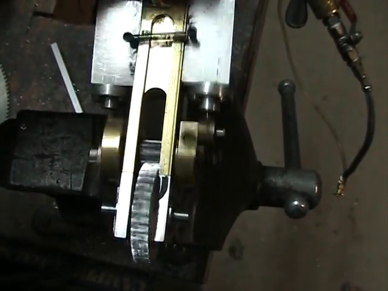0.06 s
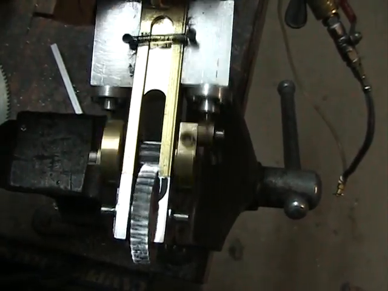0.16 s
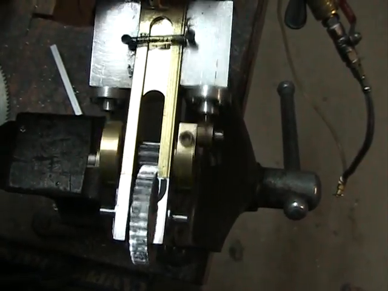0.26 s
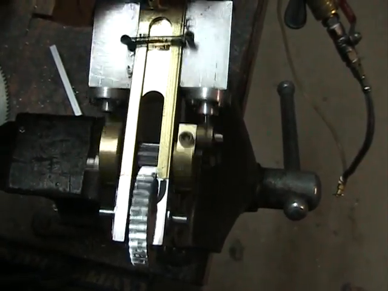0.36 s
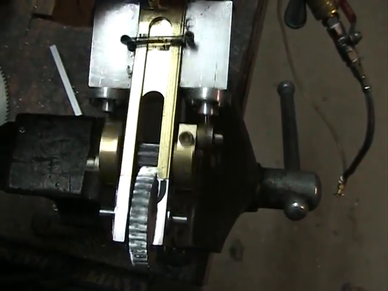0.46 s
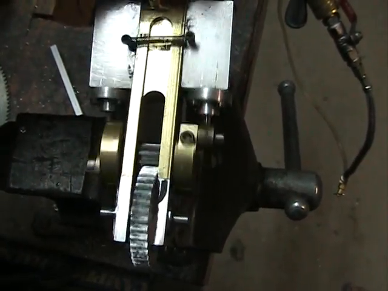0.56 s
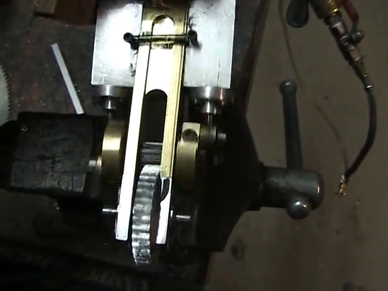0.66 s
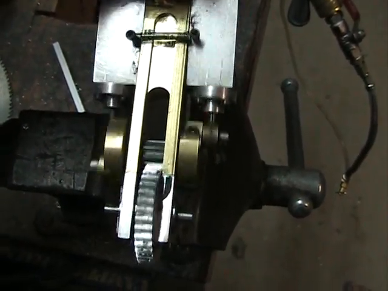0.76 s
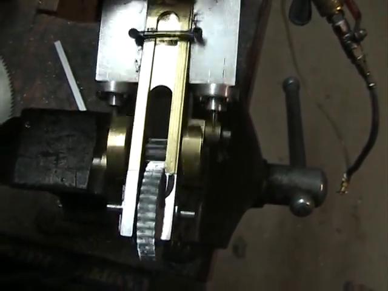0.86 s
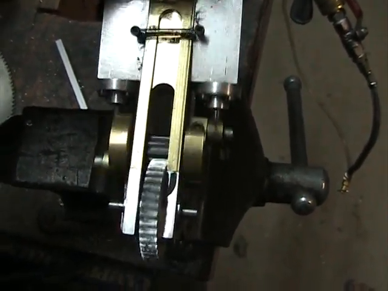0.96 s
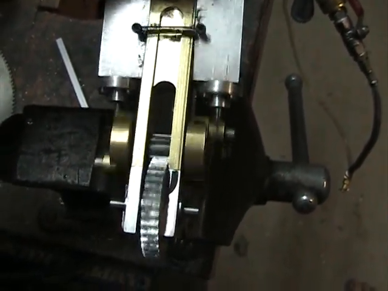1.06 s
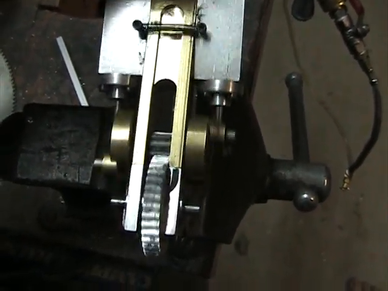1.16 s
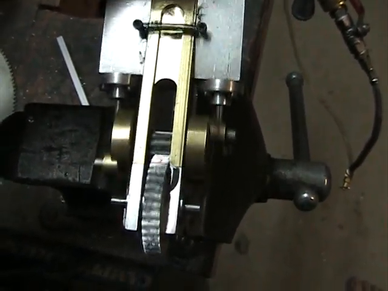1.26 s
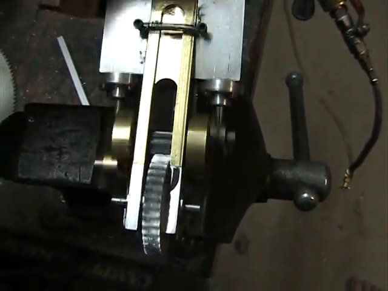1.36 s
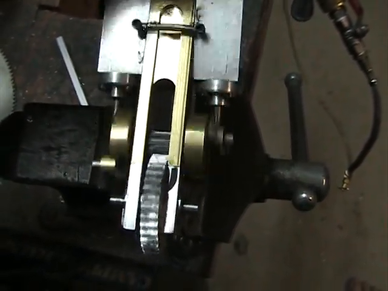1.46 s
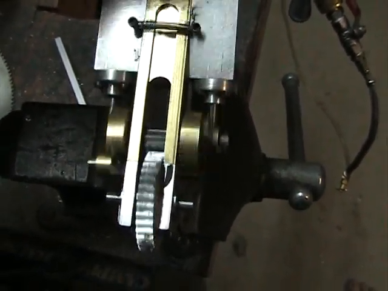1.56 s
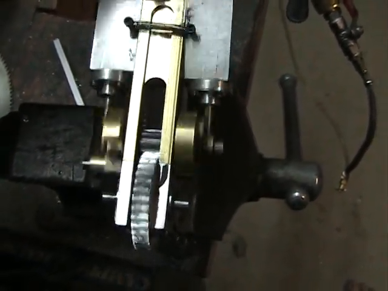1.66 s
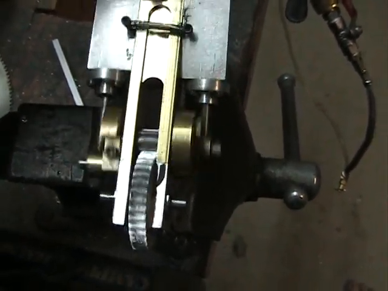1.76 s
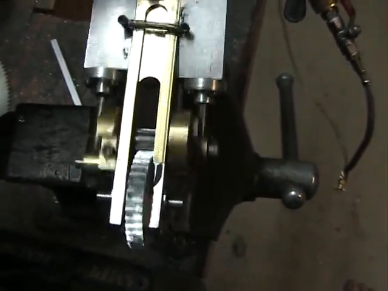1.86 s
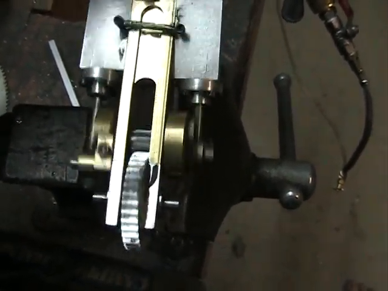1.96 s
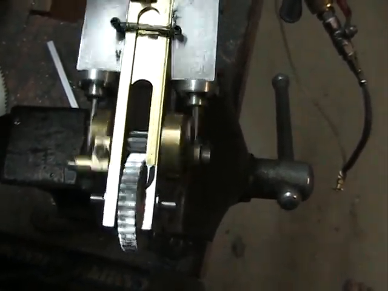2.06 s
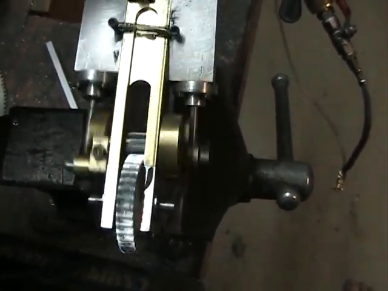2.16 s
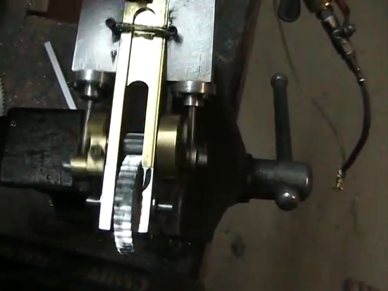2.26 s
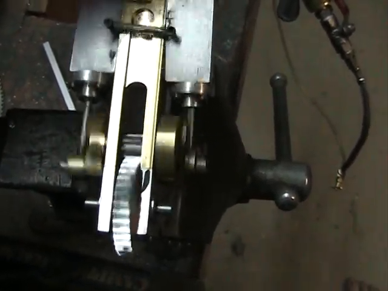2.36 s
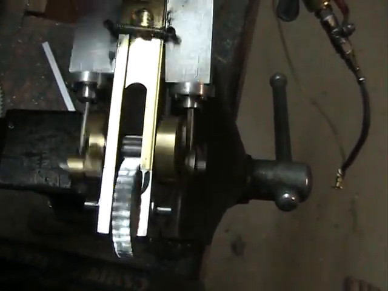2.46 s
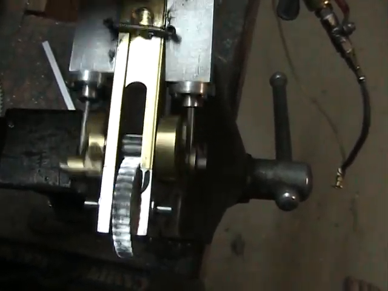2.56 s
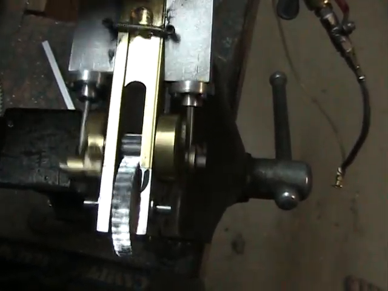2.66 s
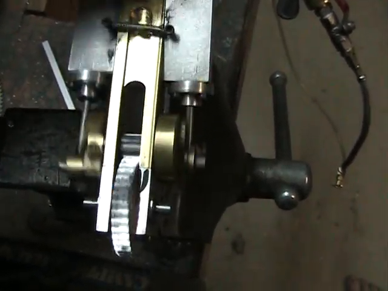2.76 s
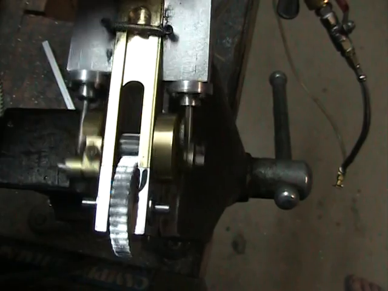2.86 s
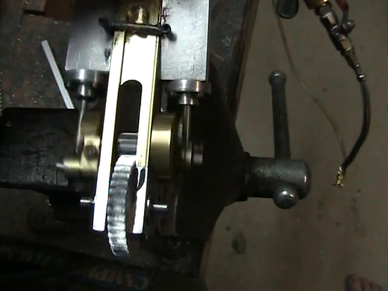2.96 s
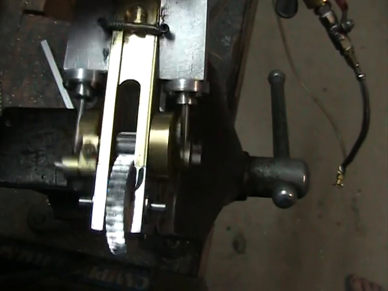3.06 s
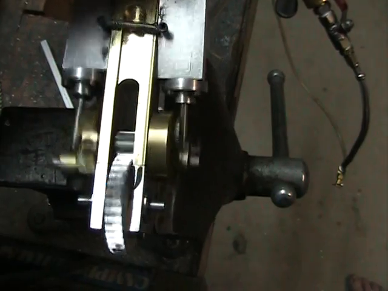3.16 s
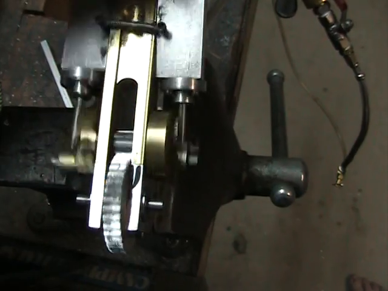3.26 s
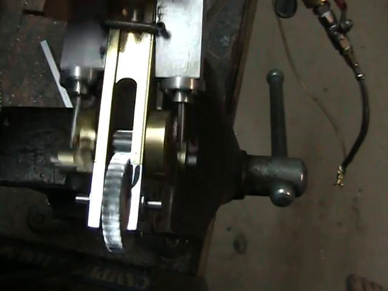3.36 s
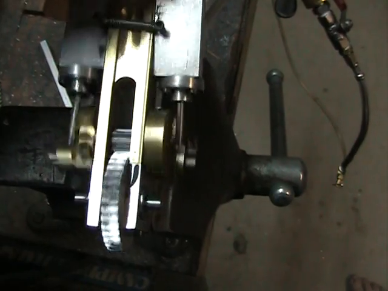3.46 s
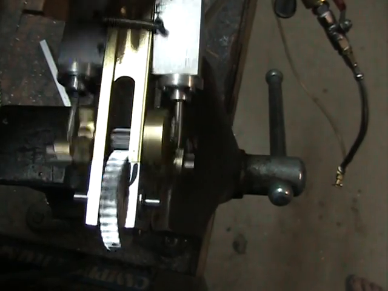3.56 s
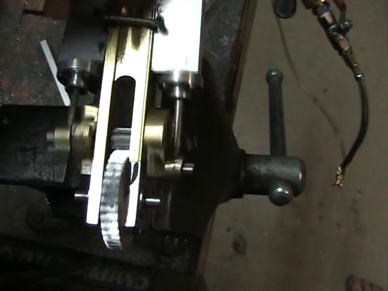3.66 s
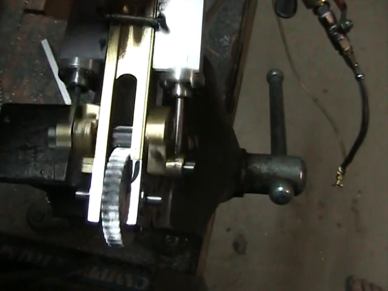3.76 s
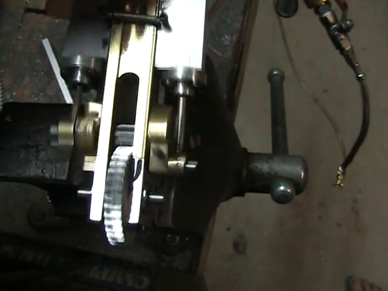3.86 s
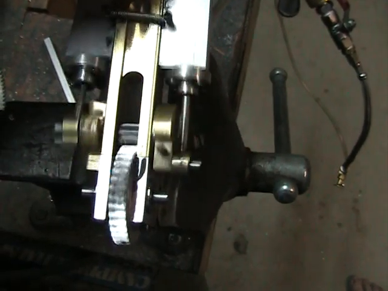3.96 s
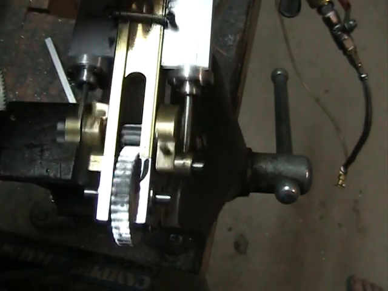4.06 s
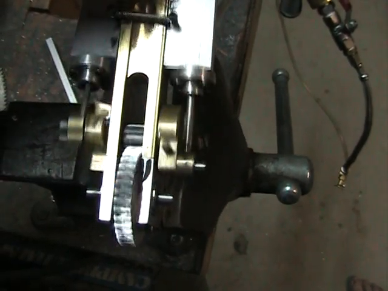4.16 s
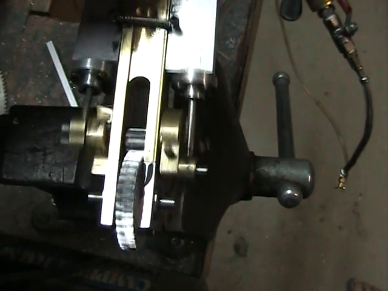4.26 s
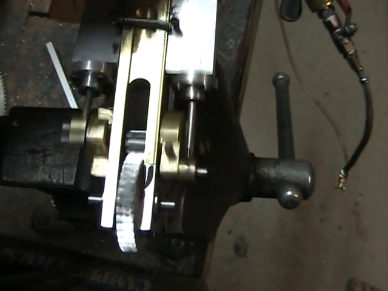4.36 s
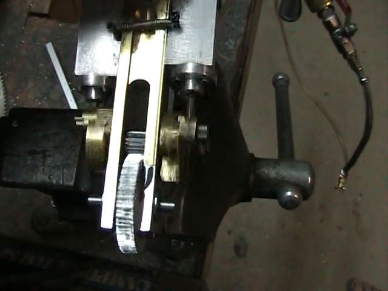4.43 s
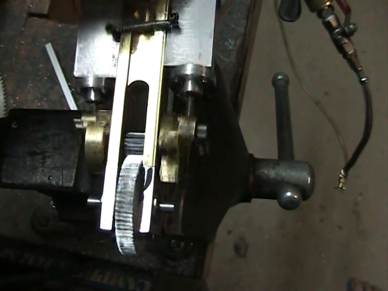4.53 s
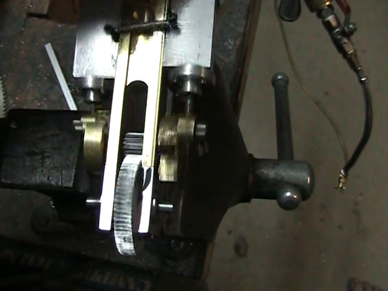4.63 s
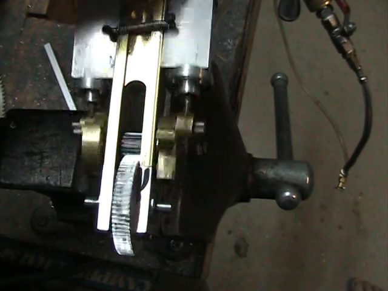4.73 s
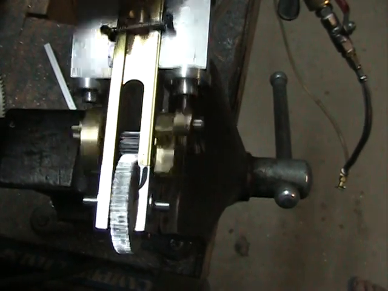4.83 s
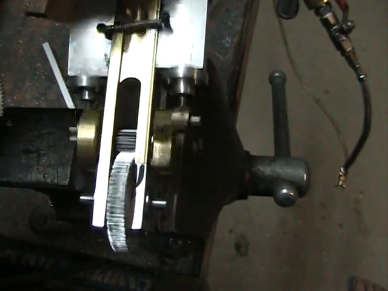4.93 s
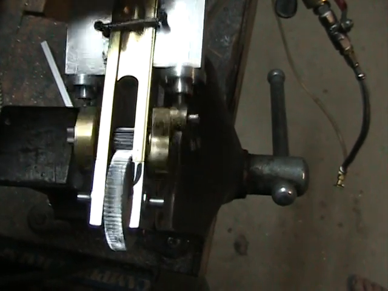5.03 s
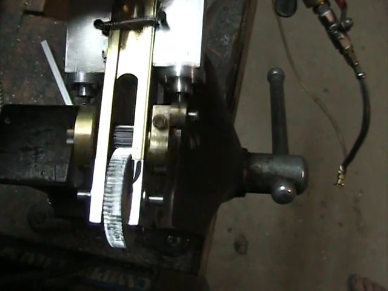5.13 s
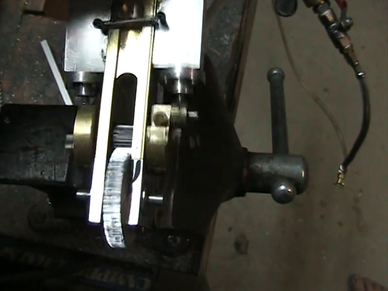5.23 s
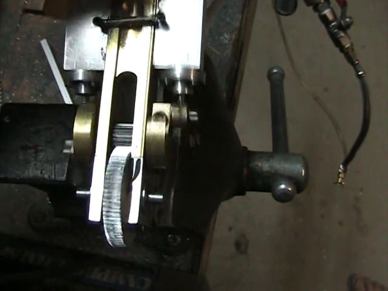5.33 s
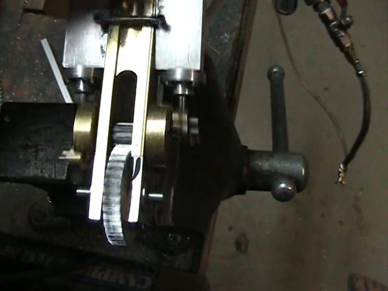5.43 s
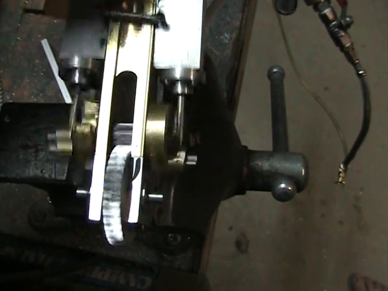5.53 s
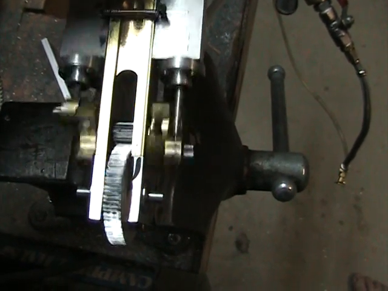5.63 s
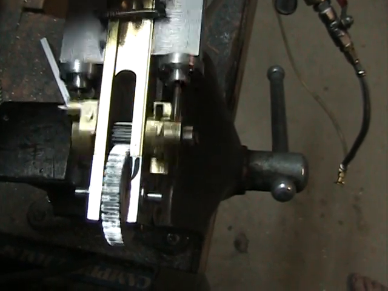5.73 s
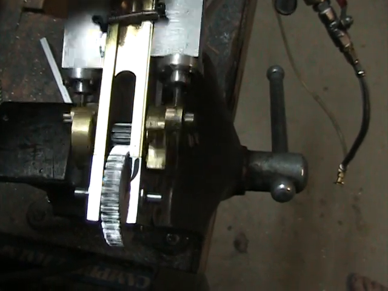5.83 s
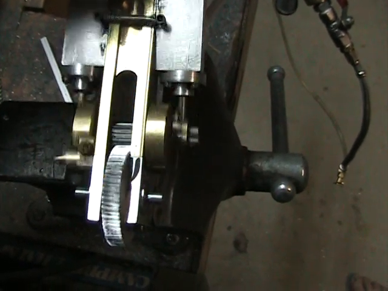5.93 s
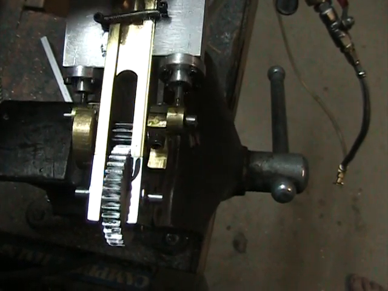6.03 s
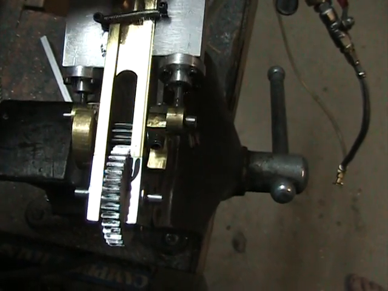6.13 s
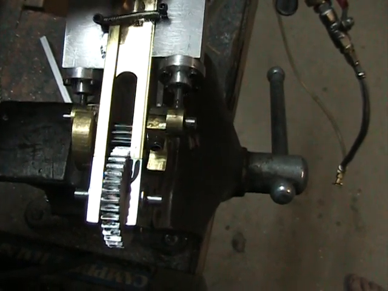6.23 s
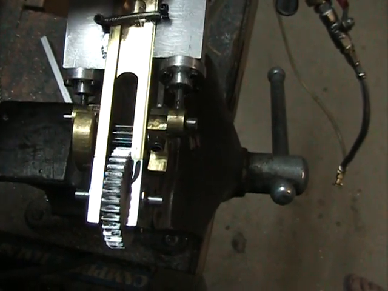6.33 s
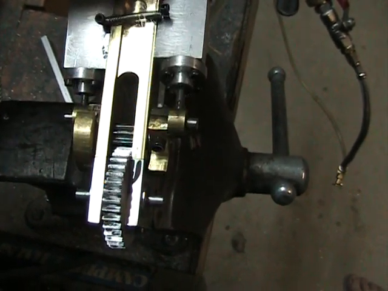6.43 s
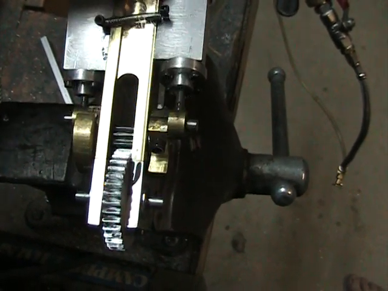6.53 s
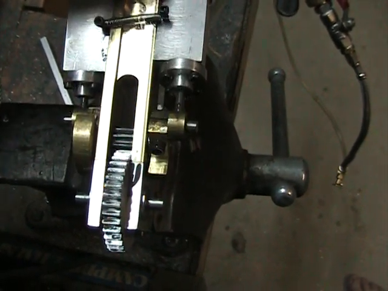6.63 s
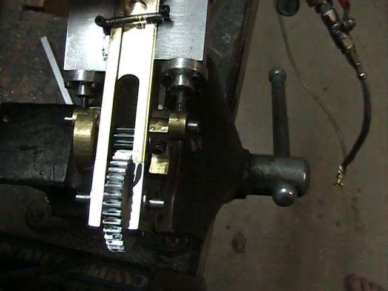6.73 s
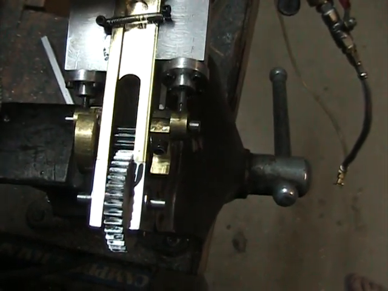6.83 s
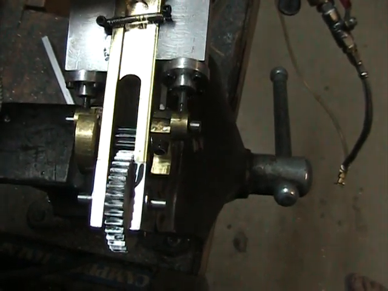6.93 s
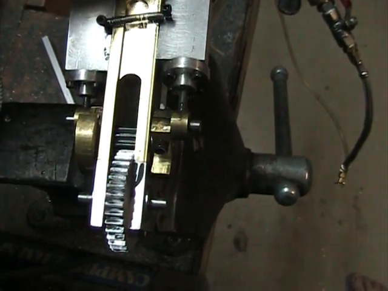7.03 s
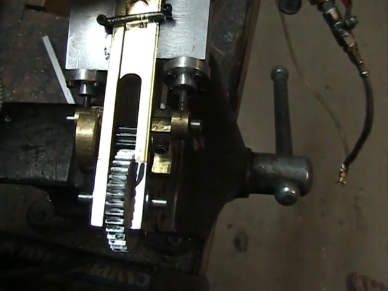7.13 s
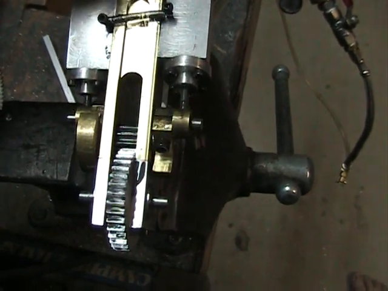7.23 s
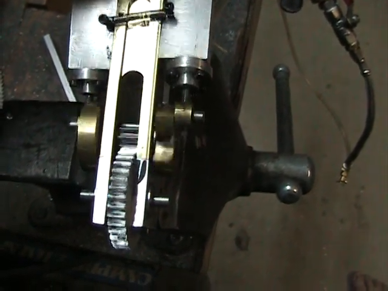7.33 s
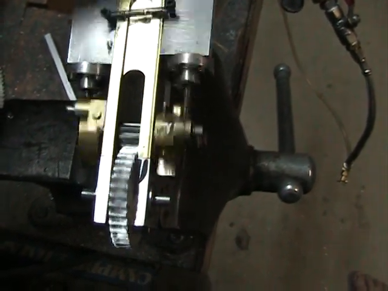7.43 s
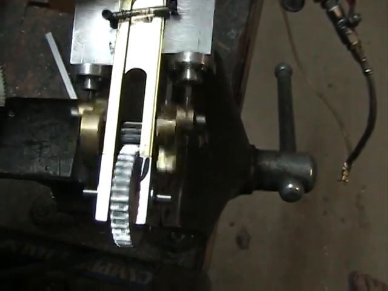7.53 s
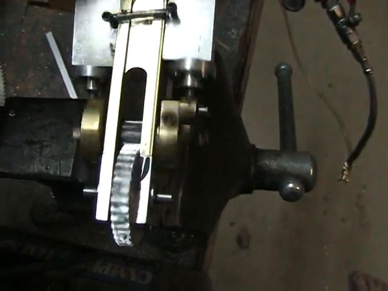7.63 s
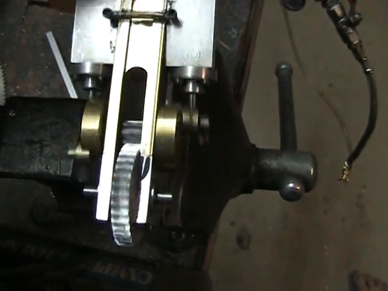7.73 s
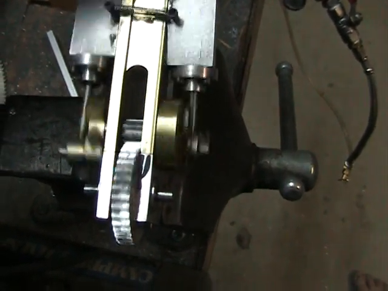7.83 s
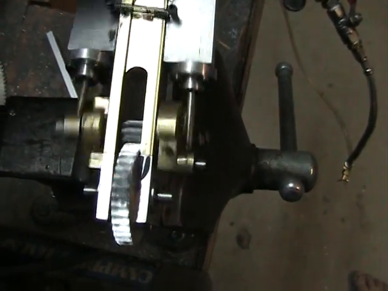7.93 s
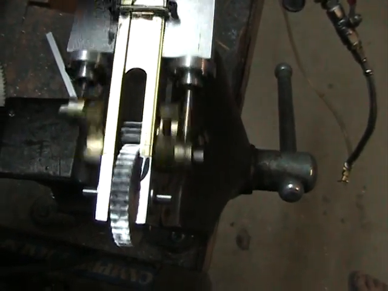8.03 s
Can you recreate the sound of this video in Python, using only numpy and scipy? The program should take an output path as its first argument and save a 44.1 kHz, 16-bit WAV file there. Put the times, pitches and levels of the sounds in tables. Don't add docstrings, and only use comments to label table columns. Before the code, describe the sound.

Close up in a quiet workshop, a small compressed-air engine runs fast, its brass gear teeth clicking unevenly over metallic frame knocks, whirring rods and a bright pulsing hiss. The turns lengthen, the rattle slows and stops, and the hiss fades. After a short near-quiet, a strong blast of air frees it and it runs again, quicker, hissier and duller.

```python
import sys
import numpy as np
from scipy import signal
from scipy.fft import rfft, irfft, next_fast_len
from scipy.io import wavfile
from scipy.ndimage import uniform_filter1d

SR = 44100
rng = np.random.default_rng(int(sys.argv[2]) if len(sys.argv) > 2 else 0)


def output_pcm(signal):
    pcm = np.clip(np.atleast_2d(signal).T, -1, 1) * 32767
    wavfile.write(sys.argv[1], SR, np.round(pcm).astype(np.int16))


def linear_from_db(decibels):
    return 10 ** (np.asarray(decibels, float) / 20)


N = 356769
SIZE = next_fast_len(N)

# (f/Hz, level/dB)
SHOP_SPECTRUM = [(15, -45), (25, -20), (53, -15), (86, -15.5), (122, -23), (156, -12.5), (227, -10.5),
                 (260, -10), (399, -6.5), (631, -15), (684, -12.5), (1380, -19.5), (1490, -20.5),
                 (8580, -23.5), (15500, -29.5)]
# (f/Hz, wander/Hz, level/dB)
HUMS = [(231, 1.19, -51), (116.3, 0.84, -57), (54.5, 3.8, -68)]
# (f/Hz, correlation)
LIKENESS = [(60, 0.71), (110, 0.42), (200, 0.88), (380, 0.97), (700, 0.92), (1290, 0.82), (2380, 0.99),
            (4400, 0.86), (8120, 1), (15000, 0.88)]
# (t/s, turns)
RUNNING = [(.0316, 0), (.2322, 2), (.7403, 7), (.939, 9), (1.1442, 11), (1.4457, 14), (1.6528, 16),
           (2.0583, 20), (2.461, 24), (2.8579, 28), (3.0585, 30), (3.462, 34), (3.672, 36), (4.6835, 46),
           (4.8921, 48), (5.0962, 50), (5.3062, 52)]
SLOWING_S = [
    5.415,
    5.5362,
    5.663,
    5.7791,
    5.9144,
    6.07,
]
RESTART_S = [
    7.405,
    7.503,
    7.589,
    7.676,
    7.7611,
    7.849,
    7.936,
    8.0136,
    8.101,
]
# (t/s, level/dB)
SUPPLY = [(0, 1), (1.5, 0), (2.97, -2.7), (3.9, -0.8), (5.5, 0.6), (5.65, 2), (5.98, -6), (6.13, -13.5),
          (6.3, -14), (6.6, -13), (6.66, -20.5), (7.15, -17), (7.23, -7), (7.32, 10), (7.46, 11.5),
          (7.64, 10), (7.85, 9.5), (8.09, 8.5)]
# (f/Hz, level/dB per Hz)
LEAK_SPECTRUM = [(710, -36), (1200, -17), (1560, -9.5), (1850, -29), (1980, -5.5), (2130, -7), (2920, -1.5),
                 (4260, -2.5), (6440, -3), (7410, -8), (8630, 3.5), (9610, 0), (10400, -2.5),
                 (15200, -10.5), (16000, -18.5)]
# (f/Hz, level/dB per Hz)
EXHAUST_SPECTRUM = [(1120, -22), (1900, -1), (3550, 3), (4280, 1.5), (4760, 3), (5590, -4), (8570, -0.5),
                    (10700, -24.5), (14200, -34), (15200, -6), (16000, -0.5)]
# (f/Hz, level/dB per Hz)
WHIRR_SPECTRUM = [(440, -12), (750, 4.5), (817, -14.5), (955, 2.5), (1300, 0), (1740, 4), (2100, -13.5),
                  (2730, -24), (4620, -120)]
TOOTH_AT = [0, .088, .183, .279, .392, .5, .62, .69, .776, .892]
# (level/dB of teeth 0, 1, 2, 3, 8)
WHEEL_CLICKS = [(-8, -6, -8, -14, -13.5), (-4.5, -7, -23, -11.5, -15), (-11, -7.5, -7.5, -14, -15.5),
                (-5.5, -9, -6.5, -8.5, -16)]
LIGHT_CLICKS = {4: -15, 5: -16, 6: -19, 7: -19, 9: -15}
# (level/dB of teeth 0, 1, 2, 3)
HEAVY_KNOCKS = [(-14.5, -20.5, -24, -28), (-17.5, -17.5, -27, -26.5), (-14.5, -15.5, -16.5, -20),
                (-10, -19, -24.5, -21.5)]
LIGHT_KNOCKS = [(-31, -29, -31, -33, -32, -32), (-30, -27, -30, -33, -34, -25),
                (-22, -26, -27, -27, -31, -25), (-28, -26, -28, -32, -30, -32)]
# (level/dB of teeth 0, 1, 2, 3, 8)
LOADED_CLICKS = [(-19, -13, -15, -14, -9)]
# (level/dB of teeth 0, 1, 2, 3)
LOADED_KNOCKS = [(-18.5, -20, -27.5, -29)]
# (t/s, click change/dB, knock change/dB)
ODD_CONTACTS = [(.110, 3.5, -6), (.260, 5, 1), (.464, 3, -4), (.639, 5.5, 3), (.839, 2, 0.5),
                (.939, 2, 5.5), (1.245, -4, -6), (1.446, -12, 2.5), (1.558, 0, -11), (1.662, -5, 2),
                (1.762, -4, -2), (2.058, -13, -5), (2.360, 1.5, -1), (2.369, -2, 4), (2.867, -5, 3),
                (2.967, 2, -1.5), (3.160, 0.5, -1.5), (3.270, -1, 6), (3.480, 4, -7), (3.681, -8, -6),
                (3.261, 3.5, 0), (4.154, 2, 3), (4.582, -5, 2), (4.684, 5, 1), (5.096, -5, 3.5),
                (5.335, 6.5, -6), (5.415, -2, 2), (7.527, 7, 5), (7.589, 7, 2), (7.936, 12, 1.5)]
# (t/s, change/dB)
KNOCK_ACCENTS = [(.232, 3.5), (.241, 4), (1.041, 2.5), (1.144, -2.5), (1.346, 5), (1.855, -0.5),
                 (1.864, 1.5), (2.157, 3), (2.678, -1), (2.759, 3.5), (2.858, 4), (3.261, 0.5), (3.362, 1),
                 (3.462, 1.5), (3.773, 0), (3.874, -4), (4.277, 0.5), (4.379, 1.5), (4.480, 2), (4.994, 0),
                 (5.201, -2), (5.306, 2.5), (5.424, 4), (5.536, 3), (5.663, -2), (5.779, -5), (5.913, 0),
                 (5.524, 5), (7.676, 2), (8.021, 3.5)]
# (f/Hz, level/dB, t60/s)
TOOTH_MODES = [(1680, -17, 0.012), (2617, -8.5, 0.005), (3550, -6, 0.005), (4700, -3.5, 0.005),
               (6370, -8.5, 0.0056), (7280, -0.5, 0.0034), (8306, -1.5, 0.0058), (9310, 0, 0.0027),
               (11360, -6.5, 0.0048), (12900, -9, 0.0043)]
# (f/Hz, level/dB, t60/s)
FRAME_MODES = [(408.6, -2, 0.043), (496, 2, 0.021), (629, -2.5, 0.019), (581.7, -7, 0.081),
               (891, -12, 0.048), (990, -13.5, 0.046), (1070, -15, 0.059), (1167, -18, 0.046),
               (1464, -14, 0.056), (1689, -13, .06), (468.6, -10.5, 0.094), (538, -12, 0.068)]
# (f/Hz, level/dB, t60/s)
BENCH_MODES = [(124.6, -2.5, 0.61), (227, -4.5, 0.066), (272.5, 11, 0.054)]
BENCH_DB = [-10, -7, -2, -5.5]
# (f/Hz, level/dB)
LEAN = [(60, 1.5), (110, 1.5), (200, 1.5), (380, 1.5), (700, 0.5), (1290, 1.5), (2380, 0.5), (4400, 0.5),
        (8120, -0.5), (15000, 0.5)]
# (f/Hz, phase/rad)
LEAD = [(0, 0), (3010, -0.14), (4910, 0.27), (5770, 0.65), (8960, 0.2), (9390, -2), (9730, 1.4),
        (10100, 1.3), (11100, 1.84), (16500, 0.67)]


def at_hz(points, hz):
    f, value = np.array(points).T
    return np.interp(np.log(np.maximum(hz, 1)), np.log(f), value)


def rms_one(x):
    return x / np.sqrt(np.mean(x ** 2) + 1e-20)


def drift(rate_hz):
    r = np.exp(-40 * np.pi * rate_hz / SR)
    slow = signal.lfilter([1], [1, -2 * r, r * r], rng.standard_normal(N // 20 + 2002))
    slow = slow[2000:]
    return np.interp(np.arange(N) / 20, np.arange(len(slow)), rms_one(slow))


def banded_noise(spectrum, patchy_db, flicker_hz):
    hz = np.arange(SIZE // 2 + 1) * SR / SIZE
    alike = np.clip(at_hz(LIKENESS, hz), 0, 1)
    shares = np.sqrt([1 + alike, 1 - alike]) * linear_from_db(at_hz(spectrum, hz))
    mid, side = rfft(rng.standard_normal((2, SIZE))) * shares
    pair = np.array([mid + side, mid - side])
    place = 2 * np.log2(np.maximum(hz, 20) / 20)
    together = drift(flicker_hz)
    out = 0
    for k in range(4):
        band = np.maximum(1 - np.abs((place - k + 2) % 4 - 2), 0)
        flicker = linear_from_db(patchy_db * (0.083 * together + drift(flicker_hz)))
        out = out + flicker * irfft(pair * band, SIZE)[:, :N]
    return rms_one(out)


def workshop():
    return linear_from_db(-39) * banded_noise(SHOP_SPECTRUM, patchy_db=0.45, flicker_hz=30)


def steady_hums():
    out = np.zeros(N)
    for hz, wander_hz, db in HUMS:
        phase = 2 * np.pi * np.cumsum(hz + wander_hz * drift(2.94)) / SR
        out += linear_from_db(db) * np.sin(phase)
    return out


def running_starts():
    s, turns = np.transpose(RUNNING)
    steady = np.interp(np.arange(turns[-1] + 1), turns, s)
    return np.concatenate([steady, SLOWING_S])


def crank_turns():
    start = np.concatenate([running_starts(), RESTART_S])
    return np.interp(np.arange(N) / SR, start, np.arange(len(start)), left=0)


def crank_speed():
    turns_per_s = uniform_filter1d(np.gradient(crank_turns()) * SR, size=2000)
    return np.log10(turns_per_s / 10 + .01)


def supply_db(t):
    return np.interp(t, *np.transpose(SUPPLY))


def resonant_noise(hz, width_hz):
    r, w = np.exp(-np.pi * width_hz / SR), 2 * np.pi * hz / SR
    noise = rng.standard_normal(N)
    return rms_one(signal.lfilter([1, 0, -1], [1, -2 * r * np.cos(w), r * r], noise))


def valve_leak():
    t = np.arange(N) / SR
    crank = 2 * np.pi * crank_turns()
    turning = (t < SLOWING_S[-1]) | (t > RESTART_S[0])
    puff_db = -24 + 8 * np.cos(crank - .3)
    puff = turning * linear_from_db(puff_db) * resonant_noise(1645, width_hz=220)
    glint_s, glint_lasts_s = 2.9, 0.74
    swelling = np.exp(-((t - glint_s) / glint_lasts_s) ** 2)
    glint = linear_from_db(-9) * swelling * resonant_noise(9750, width_hz=400)
    jet = banded_noise(LEAK_SPECTRUM, patchy_db=1.65, flicker_hz=24.8)
    swell_db = 1.24 + 0.96 * np.cos(crank - .8)
    return linear_from_db(-30.5 + supply_db(t) + swell_db) * (jet + puff + glint)


def exhaust():
    t = np.arange(N) / SR
    crank = 2 * np.pi * crank_turns()
    fill_lag_s = 0.025
    starved_below_db, starve_slope = -4.5, 1.9
    shortfall_db = np.minimum(supply_db(np.maximum(t - fill_lag_s, 0)) - starved_below_db, 0)
    breakaway_s, breakaway_width_s = 7.38, 0.045
    burst_db = 6.5 * np.exp(-((t - breakaway_s) / breakaway_width_s) ** 2)
    whine_hz = 15500
    top = signal.butter(2, [whine_hz - 400, whine_hz + 500], "band", fs=SR, output="sos")
    narrow = rms_one(signal.sosfilt(top, rng.standard_normal((2, N))))
    whine = linear_from_db(-11 + 36 * crank_speed()) * narrow
    port = linear_from_db(-4.5) * resonant_noise(3540, width_hz=850)
    jet = banded_noise(EXHAUST_SPECTRUM, patchy_db=3.5, flicker_hz=30.8)
    swell_db = -3.48 + 0.72 * np.cos(crank - .6)
    level_db = -23.5 + starve_slope * shortfall_db + burst_db + swell_db
    return linear_from_db(level_db) * (jet + whine + port)


def whirr():
    loaded = np.arange(N) / SR > RESTART_S[0]
    level_db = -38.5 - 4 * loaded + 25 * crank_speed()
    return linear_from_db(level_db) * banded_noise(WHIRR_SPECTRUM, patchy_db=3.1, flicker_hz=30)


def teeth(start, clicks, knocks, slack_db):
    turn_s = np.diff(start)
    at_s = start[:-1, None] + np.outer(turn_s, TOOTH_AT)
    quarter = np.arange(len(at_s)) % 4
    speed_db = -70 * np.log10(np.maximum(turn_s / .105, 1))[:, None]
    click_db = np.zeros(at_s.shape)
    click_db[:, [0, 1, 2, 3, 8]] = np.array(clicks)[quarter % len(clicks)] + 0.47 * speed_db
    click_db[:, list(LIGHT_CLICKS)] = np.array(list(LIGHT_CLICKS.values())) + 1.1 * speed_db
    heavy_db = np.array(knocks)[quarter % len(knocks)]
    light_db = np.array(LIGHT_KNOCKS)[quarter] + slack_db + 0.19 * speed_db
    knock_db = np.hstack([heavy_db, light_db])
    click_db = click_db + 1.6 * rng.standard_normal(at_s.shape)
    knock_db = knock_db + 1.2 * rng.standard_normal(at_s.shape)
    return at_s.ravel(), click_db.ravel(), knock_db.ravel(), np.repeat(quarter, 10)


def tooth_contacts():
    running = teeth(running_starts(), WHEEL_CLICKS, HEAVY_KNOCKS, slack_db=2.5)
    restart = teeth(np.array(RESTART_S), LOADED_CLICKS, LOADED_KNOCKS, slack_db=-1.5)
    at_s, click_db, knock_db, quarter = map(np.concatenate, zip(running, restart))
    odd_s, odd_click_db, odd_knock_db = np.transpose(ODD_CONTACTS)
    odd = np.abs(at_s - odd_s[:, None]).argmin(axis=1)
    click_db[odd] += odd_click_db
    knock_db[odd] += odd_knock_db
    accent_s, accent_db = np.transpose(KNOCK_ACCENTS)
    accented = np.abs(at_s - accent_s[:, None]).argmin(axis=1)
    knock_db[accented] += accent_db
    return at_s, click_db, knock_db, quarter


def hard(force):
    return force


def soft(force):
    return signal.lfilter(np.hanning(24) / 11, [1], force)


def strike(at_s, db, modes, spread_db, scatter_s, contact):
    out = np.zeros(N)
    luck = rng.standard_normal((len(at_s), len(modes), 2))
    for k, (hz, mode_db, t60) in enumerate(modes):
        at = ((at_s + scatter_s * luck[:, k, 1]) * SR).astype(int)
        inside = (at > 0) & (at < N)
        blow = linear_from_db(db + mode_db + spread_db * luck[:, k, 0]) * (-1) ** k
        force = np.full(N, 1e-18)
        force[at[inside]] = blow[inside]
        r, w = linear_from_db(-60 / (t60 * SR)), 2 * np.pi * hz / SR
        out += signal.lfilter([0, np.sin(w)], [1, -2 * r * np.cos(w), r * r], contact(force))
    return out


def cut_low(x, hz):
    return signal.sosfilt(signal.butter(3, hz, "high", fs=SR, output="sos"), x)


def tooth_clicks(at_s, click_db):
    touch_s = np.concatenate([at_s - .0005, at_s + .0002, at_s + .0010])
    rebound_db = click_db + .6 * np.minimum(click_db + 10, 0)
    touch_db = np.concatenate([click_db - 5, rebound_db - 11, rebound_db - 11])
    clicks = strike(touch_s, touch_db, TOOTH_MODES, spread_db=1.03, scatter_s=.0001, contact=hard)
    return cut_low(clicks, 1080)


def frame_knocks(at_s, knock_db):
    knocks = strike(at_s + .0016, knock_db - 4, FRAME_MODES, spread_db=2.66, scatter_s=.0001, contact=soft)
    cushion = signal.butter(2, 820, fs=SR, output="sos")
    dull = signal.sosfilt(cushion, knocks)
    knocks = np.where(np.arange(N) / SR > RESTART_S[0] - .1, dull, knocks)
    return cut_low(cut_low(knocks, 337), 330)


def bench_thumps(at_s, knock_db, quarter):
    thump_db = np.array(BENCH_DB)[quarter] + 0.61 * knock_db - 32.5
    thumps = strike(at_s + .00369, thump_db, BENCH_MODES, spread_db=0, scatter_s=.00082, contact=soft)
    return cut_low(thumps, 108)


def gears():
    at_s, click_db, knock_db, quarter = tooth_contacts()
    clicks = tooth_clicks(at_s, click_db)
    knocks = frame_knocks(at_s, knock_db)
    return clicks + knocks + bench_thumps(at_s, knock_db, quarter)


def scene():
    background = workshop() + steady_hums()
    return background + valve_leak() + exhaust() + whirr() + gears()


def roll_off(x):
    return signal.sosfilt(signal.butter(12, 16910, fs=SR, output="sos"), x)


def record(dry):
    hz = np.arange(SIZE // 2 + 1) * SR / SIZE
    colour = linear_from_db(np.outer([.5, -.5], at_hz(LEAN, hz)))
    phase = np.exp(np.outer([.5j, -.5j], at_hz(LEAD, hz)))
    top_cut = linear_from_db(-np.clip((hz - 15720) / 3, 0, 70))
    limited = 1.134 * np.tanh(dry / 0.96)
    mix = irfft(rfft(limited, SIZE) * colour * phase * top_cut, SIZE)[:, :N]
    return roll_off(mix)


dry = scene()
out = record(dry)
output_pcm(out)
```